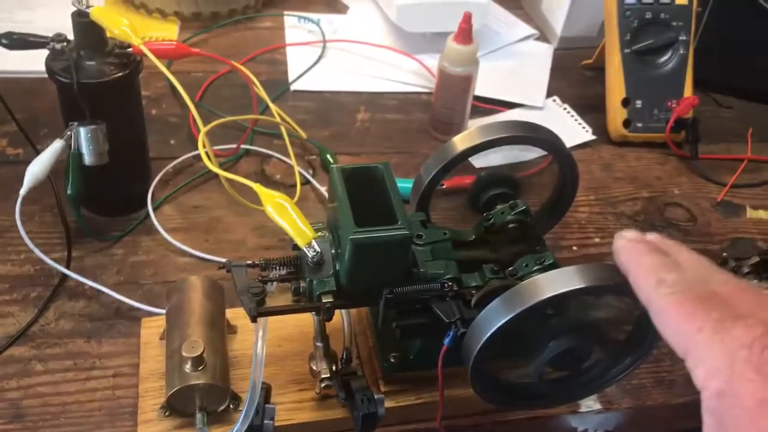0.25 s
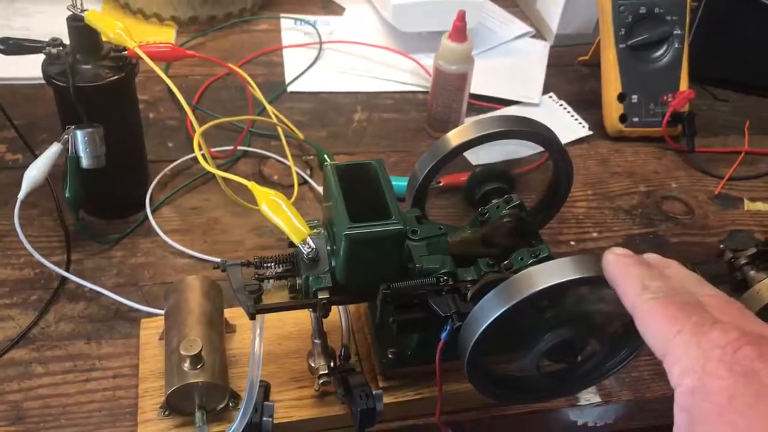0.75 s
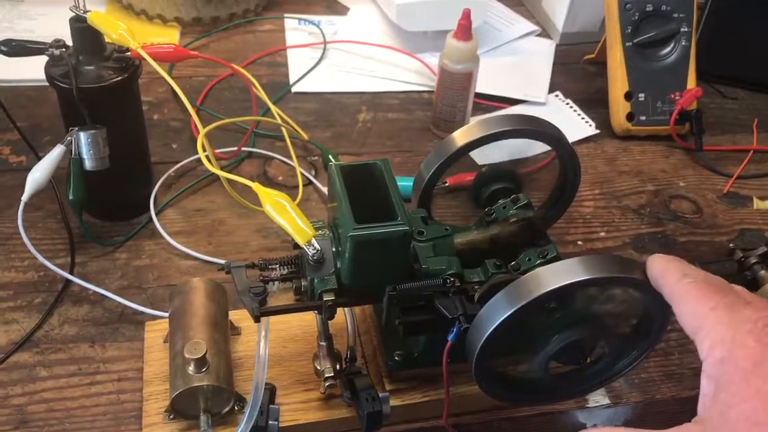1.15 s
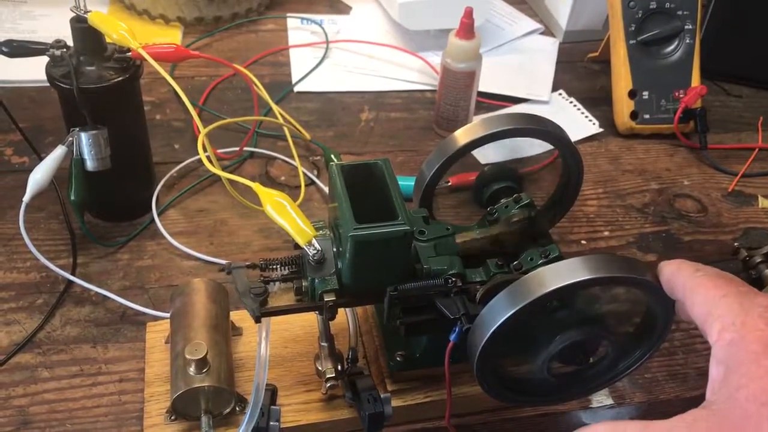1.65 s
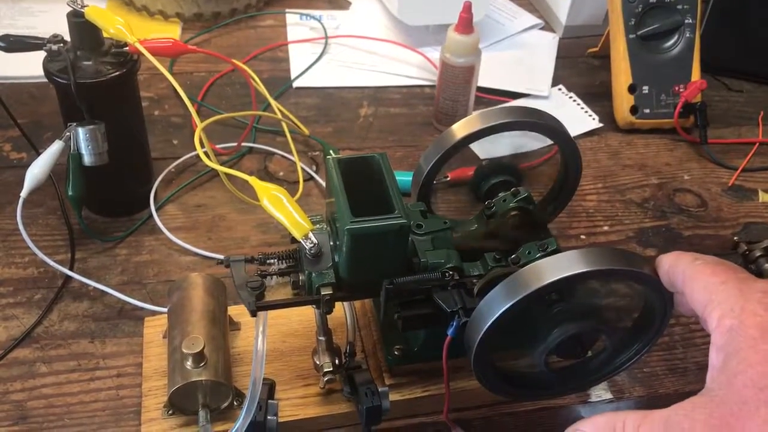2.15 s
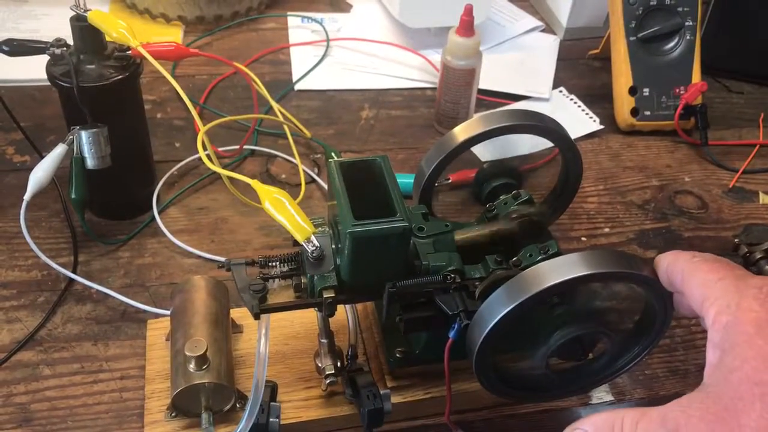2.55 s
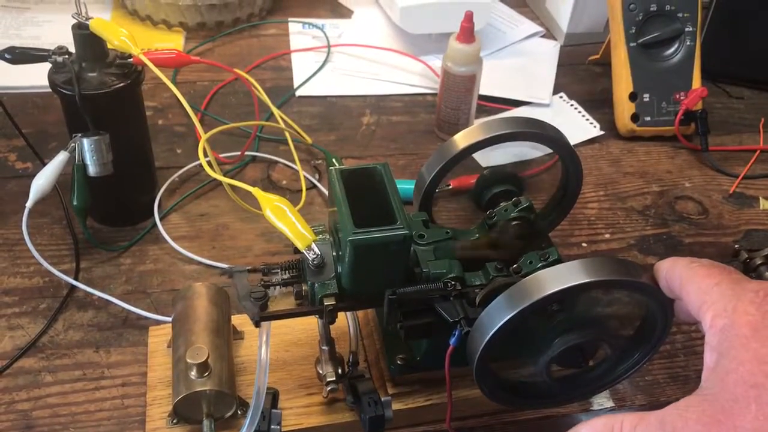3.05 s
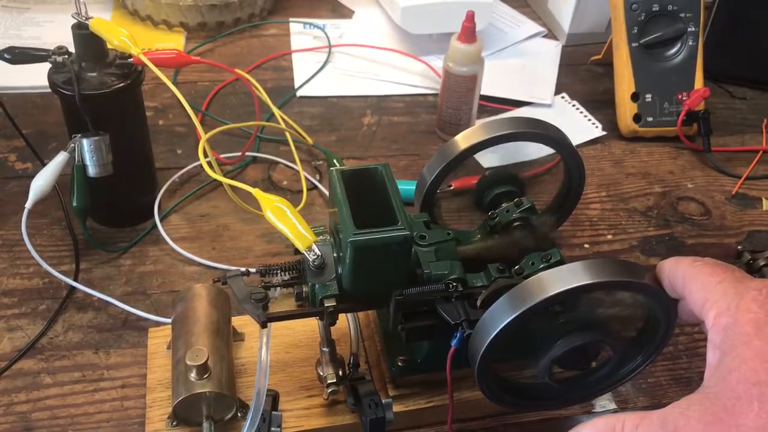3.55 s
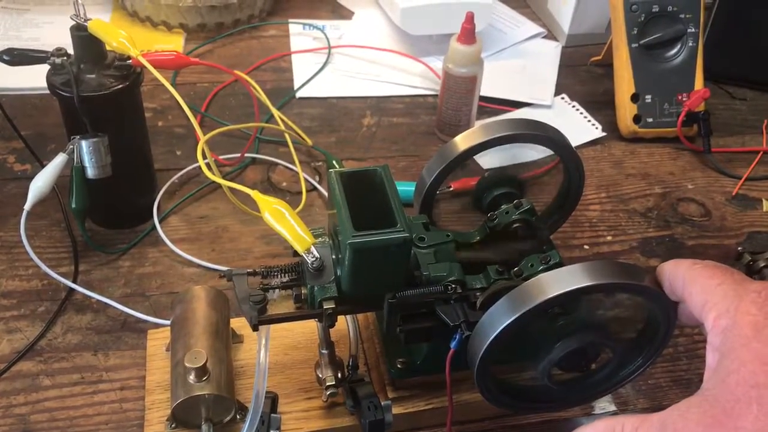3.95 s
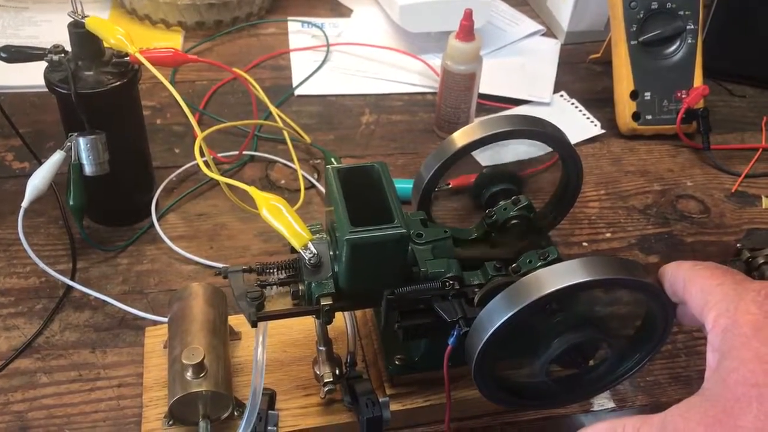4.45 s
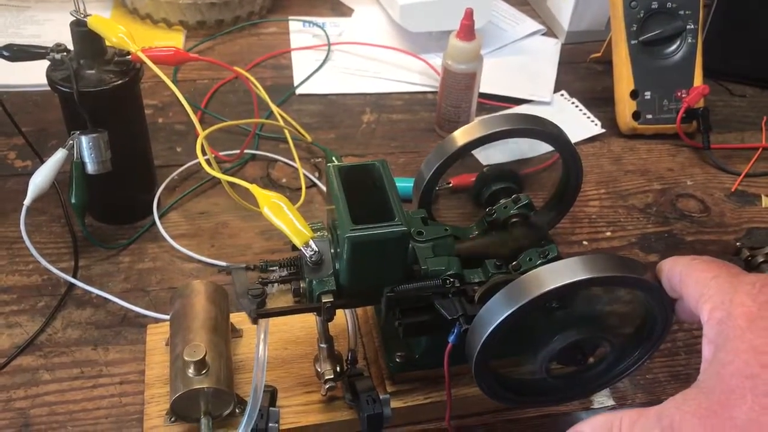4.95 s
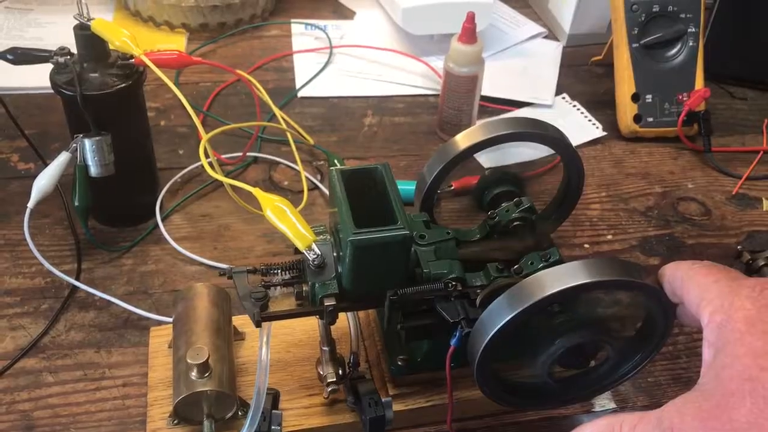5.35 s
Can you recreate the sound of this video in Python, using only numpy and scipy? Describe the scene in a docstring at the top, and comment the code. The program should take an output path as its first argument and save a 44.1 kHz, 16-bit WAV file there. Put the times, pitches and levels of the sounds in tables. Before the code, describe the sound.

Quick iron knocks and ticks come from a miniature gas engine turning at an even speed close to the microphone. Sharp exhaust pops cut through about three times a second in a slightly uneven rhythm, each thumping the wooden bench. Just past halfway it softly misfires once, among stray clacks, and carries on. Soft valve sighs, a thin hiss and a faint hum sit underneath in a small workshop.

```python
"""A model gas engine on a workbench

A small hit-and-miss engine runs close by, at about nine turns a second. It coasts for a few turns,
then fires, mostly on every second or third turn: a sharp exhaust pop and a thump into the wooden bench.
The connecting rod knocks on coasting turns, the piston slaps after each knock or pop, and air sighs
through the open exhaust valve. Once it misfires with a soft thud. The small room has a faint hum."""
import sys
import numpy as np
from scipy import signal
from scipy.io import wavfile
from scipy.ndimage import uniform_filter1d

SR = 44100
rng = np.random.default_rng(int(sys.argv[2]) if len(sys.argv) > 2 else 0)


def master(y):
    """Save y as 16-bit WAV."""
    cut = np.clip(np.atleast_2d(y).T, -1, 1)
    pcm = np.round(cut * 32767)  # scale
    wavfile.write(sys.argv[1], SR, pcm.astype(np.int16))


N = 246947
DEAD_CENTRE = .89  # how far through a turn the piston is deepest in the cylinder


# turns on which the engine fires: (time [s], relative level [dB])
FIRING_TURNS = [(0.7051, -15), (1.2471, -15), (1.5826, -15.5), (1.928, -15), (2.1515, -14), (2.4814, -15),
                (2.815, -15), (3.155, -17), (3.507, -15.5), (3.7355, -16), (4.0677, -15.5), (4.4013, -14),
                (4.7378, -14.5), (5.074, -15), (5.4179, -15.5)]
# tone of the first crack of gas: (frequency [Hz], relative level [dB])
CRACK_TONE = [(100, -40), (500, 3.5), (1000, -9.5), (1600, 0.5), (2200, -3), (3500, 2), (5000, -4),
              (8000, 1), (10200, -5), (11800, 5), (15000, -5)]
# tone of the gush and hiss that follow: (frequency [Hz], relative level [dB])
GUSH_TONE = [(100, -8), (1000, -6), (2200, -12), (3500, -16), (5000, 2.5), (8000, -4), (10200, -5.5),
             (11500, -5), (13000, 0), (15500, -4.5)]
# ringing notes of the thin metal exhaust pipe: (frequency [Hz], relative level [dB], ring time [s])
PIPE_NOTES = [(4680, -1, 0.039), (5985, -6, 0.02), (6900, 6, 0.017), (7600, 7, 0.014), (8830, 28, 0.021),
              (9190, -28, 0.041), (9600, -2, 0.02), (11360, 18, 0.017), (12000, -16, 0.013),
              (12200, -13, .04), (13100, -20, 0.032), (13100, 21, 0.034), (14800, -11, 0.03)]
# the direct sound, then its echoes off the bench and things on it: (delay [s], gain [ratio])
BENCH_ECHOES = [(0, 1), (.0007, .05), (.0019, -.04), (.0031, .2), (.0124, -.06)]

def exhaust_pops(gush_db=-2, hiss_db=-13, pipe_gain=.22):
    """Burnt gas cracks out, gushes and trails off in a hiss. It rings the pipe and echoes off the bench."""
    jet, out = np.zeros(N), np.zeros(N)
    for time, db in FIRING_TURNS:
        crack = normalise(shape_tone(puff(rise_s=.0015, decay_s=.002), CRACK_TONE), size=165)
        gush = normalise(shape_tone(puff(rise_s=.0013, decay_s=.0022), GUSH_TONE), size=180)
        hiss = normalise(shape_tone(puff(rise_s=.0015, decay_s=.008), GUSH_TONE), size=400)
        add(jet, time, gain(db) * crack)
        add(jet, time + .004, gain(db) * (gain(gush_db) * gush + gain(hiss_db) * hiss))
    pipe = ring(PIPE_NOTES, size=3000)
    jet += pipe_gain * signal.fftconvolve(jet, pipe / np.linalg.norm(pipe))[:N]
    for delay, strength in BENCH_ECHOES:
        add(out, delay, strength * jet)
    return out


# low notes of the exhaust port and bench: (frequency [Hz], relative level [dB], ring time [s])
THUMP_NOTES = [(75, -19.5, 0.29), (98.3, -15, 0.17), (120.4, -13, 0.2), (171.3, -11, 0.073),
               (219.6, -1.5, 0.053), (263.8, -13.5, 0.11), (505.6, -3.5, 0.063), (541, -24, 0.12),
               (796, -9.5, 0.13), (921, -8.5, 0.23)]

def bench_thumps(level_db=-24, delay_s=.0031):
    """The push of each firing builds over a millisecond or so and shakes the port and the bench."""
    out = np.zeros(N)
    for time, _ in FIRING_TURNS:
        shake = strike(THUMP_NOTES, spread_db=1.4, size=12000)
        thump = normalise(np.convolve(shake, np.hanning(70)), size=530)  # smoothing softens the start
        add(out, time + delay_s, gain(level_db) * thump)
    return out


# turns on which the engine coasts and the rod knocks: (time [s], relative level [dB])
COASTING_TURNS = [(0.0455, -20.5), (0.1493, -19.5), (0.2556, -20), (0.3647, -21.5), (0.4764, -21),
                  (0.5906, -21), (0.8048, -23), (0.9081, -20), (1.0155, -19.5), (1.13, -22),
                  (1.3527, -21.5), (1.465, -22), (1.69, -26), (1.8057, -21.5), (2.038, -23),
                  (2.2556, -24.5), (2.3662, -21), (2.5869, -22.5), (2.6984, -21.5), (2.9215, -22.5),
                  (3.0358, -23), (3.2647, -23.5), (3.6195, -23), (3.84, -23), (3.9518, -21),
                  (4.1738, -22.5), (4.286, -21.5), (4.5079, -21.5), (4.6202, -21), (4.8438, -22.5),
                  (4.956, -22.5), (5.1816, -22.5), (5.2961, -22), (5.5273, -21.5)]
# hollow notes of the case around the crank: (frequency [Hz], relative level [dB], ring time [s])
CRANKCASE_NOTES = [(1130, -8, .05), (1490, -1, .055), (1630, 0, .04), (1770, -4, .05)]

def rod_knocks(knock_db=-2, hollow_db=-7):
    """On each coasting turn the connecting rod knocks the iron, and the hollow crankcase rings briefly."""
    out = np.zeros(N)
    for time, db in COASTING_TURNS:
        treble_db = rng.normal(5, 1.8)
        knock = iron_hit(treble_db, ring_db=-4, rise_s=.0005, decay_s=.0013, chatter_bass_db=-9)
        crankcase = strike(CRANKCASE_NOTES, spread_db=2.8, size=2500)
        hollow = normalise(np.convolve(crankcase, np.hanning(12)), size=300)
        add(out, time, gain(db + knock_db) * knock)
        add(out, time + .0008, gain(db + hollow_db) * hollow)
    return out


def piston_slaps(level_db=-31, delay_s=.0254):
    """The piston slaps about a quarter of a turn after each knock or firing, never quite the same."""
    out = np.zeros(N)
    for time, _ in list(COASTING_TURNS) + list(FIRING_TURNS):
        slap_time = time + rng.normal(delay_s, .0006)
        slap_db = rng.normal(level_db, 1.5)
        slap = iron_hit(treble_db=2, ring_db=-2, rise_s=.0026, decay_s=.0021, chatter_bass_db=.5)
        add(out, slap_time, gain(slap_db) * slap)
    return out


# stray clacks, ticks and one faint slap: (time [s], level [dB], treble boost [dB], chatter decay [s])
STRAY_HITS = [(3.305, -29, 8, 0.00057), (3.3092, -16, 8.5, 0.0023), (3.381, -40, 26, .0008),
              (3.412, -38, 5, 0.0024), (5.564, -28, 33, 0.00088), (5.5659, -19, 5.5, 0.0034)]

def stray_hits():
    """Stray metal clacks and ticks, and one faint piston slap after the misfire, barely ring the iron."""
    out = np.zeros(N)
    for time, db, treble_db, decay_s in STRAY_HITS:
        hit = iron_hit(treble_db, ring_db=-14, rise_s=.0004, decay_s=decay_s, chatter_bass_db=-8)
        add(out, time, gain(db) * hit)
    return out


# ringing notes of the iron frame and flywheels: (frequency [Hz], relative level [dB], ring time [s])
IRON_NOTES = [(721, -7.9, 0.09), (953, -9.4, 0.09), (1093, -9.8, 0.09), (1163, -7.5, 0.09),
              (1459, 0.0, 0.09), (1518, -3.5, 0.09), (1680, -3.3, 0.09), (1750, -2.9, 0.09),
              (2417, -9.9, 0.06), (2611, -10.2, 0.06), (2767, -11.5, 0.06), (3451, -10.1, 0.06),
              (3758, -6.5, 0.05), (3892, -8.5, 0.05), (4005, -9, 0.05), (4156, -8.8, 0.06),
              (5033, -13.3, 0.06), (5233, -11.3, 0.06), (5518, -12.3, 0.06), (6336, -13.4, 0.06),
              (6417, -14.3, 0.06), (7461, -16.6, 0.06), (8398, -15.6, 0.06), (9324, -13.4, 0.06),
              (11170, -14.7, 0.06), (11375, -14.8, 0.06), (12888, -14.5, 0.06), (13986, -15.1, 0.06)]
# tone of the engine's tick and rattle when hit: (frequency [Hz], relative level [dB])
CLATTER_TONE = [(100, -68), (500, -26), (1000, 3), (1600, -0.5), (2400, 3), (3100, -5), (3800, 6.5),
                (4700, -16), (5600, -9.5), (7800, -18.5), (9400, -11.5), (10400, -18), (11500, -12),
                (15500, -19.5)]

def iron_hit(treble_db, ring_db, rise_s, decay_s, chatter_bass_db, size=3200):
    """A firm push and a chattering contact make the frame tick, rattle its loose parts and ring."""
    ringing = normalise(strike(IRON_NOTES, spread_db=2.8, size=size))
    # the push is the same every time; the chatter is fresh noise
    pulse = signal.unit_impulse(1024, int(rise_s * SR))
    push = shape_tone(pulse, [(2500, -13.5), (6000, -1.5), (12000, -39)])
    contact = normalise(puff(rise_s, decay_s, size=1024)) / np.sqrt(1024)
    chatter = shape_tone(contact, [(1700, chatter_bass_db), (5000, 0)])
    tick = normalise(shape_tone(signal.unit_impulse(size), CLATTER_TONE))
    rattle = normalise(shape_tone(puff(rise_s=.0026, decay_s=.006, size=size), CLATTER_TONE))
    frame = tick + gain(-3) * rattle + gain(ring_db) * ringing
    hit = signal.fftconvolve(push + chatter, frame)
    return normalise(shape_tone(hit, [(3500, 0), (8000, treble_db)]), size=300)


# when the engine misfires: (time [s], level [dB])
MISFIRES = [(3.382, -36)]
# dull notes of the misfire's thud: (frequency [Hz], relative level [dB], ring time [s])
MISFIRE_NOTES = [(187, 15, 0.03), (295, 15, 0.02), (396, -13, 0.03)]

def misfire_thud():
    """A misfire: one soft, dull thud in place of a firing."""
    out = np.zeros(N)
    for time, db in MISFIRES:
        add(out, time, gain(db) * normalise(ring(MISFIRE_NOTES), size=530))
    return out


# tone of gas squeezing past the piston: (frequency [Hz], relative level [dB])
LEAK_TONE = [(300, -22), (1500, -10), (1900, 8), (2300, -8), (3300, 1), (5000, -12), (10000, -16),
             (11800, -4), (15000, -6)]

def piston_leaks(level_db=-36.5, lead_s=.024):
    """Just before each firing, a little of the squeezed gas chirps past the piston."""
    out = np.zeros(N)
    for time, _ in FIRING_TURNS:
        chirp = normalise(shape_tone(puff(rise_s=.004, decay_s=.008), LEAK_TONE), size=400)
        add(out, time - lead_s, gain(rng.normal(level_db, 1.5)) * chirp)
    return out


# gusts through the valve in each turn: (position [turns], width [turns], level [dB])
VALVE_GUSTS = [(.06, 0.13, -42), (0.311, 0.19, -47), (.83, 0.02, -52.5)]

def valve_sighs(turn, middle_hz=1098, swing_octaves=.76, width_hz=120):
    """Air pumped through the valve sounds the cylinder: lower as the piston draws out, higher going in."""
    pitch_hz = middle_hz * 2 ** (swing_octaves * np.cos(2 * np.pi * (turn - DEAD_CENTRE)))
    note = np.exp(2j * np.pi * np.cumsum(pitch_hz) / SR)
    # smoothed noise turns the pure note into a breathy one
    noise = rng.standard_normal(N) + 1j * rng.standard_normal(N)
    smoothing = np.exp(-np.pi * width_hz / SR)
    flutter = signal.lfilter([1], [1, -2 * smoothing, smoothing ** 2], noise)
    gusts = sum(swell(turn, *gust) for gust in VALVE_GUSTS)
    return gusts * normalise((flutter * note).real)


# tone of the sliding parts: (frequency [Hz], relative level [dB])
RUB_TONE = [(100, 2), (400, -2.5), (900, 3), (1250, 2), (1600, 0.5), (2800, -3.5), (3900, 0), (5000, -6.5),
            (8000, -12.5), (10400, -19), (12000, -7), (15500, -12.5)]
# scrapes of the valve gear in each turn: (position [turns], width [turns], relative level [dB])
VALVE_SCRAPES = [(0.318, 0.09, -38), (.63, 0.018, -48)]

def rubbing(turn, rest_db=-52.5, moving_db=-49.5, ring_db=-7):
    """Piston and gears rub, louder as the piston speeds up. They scrape twice a turn and ring the iron."""
    grit = rng.standard_normal(N) * gain(4 * rng.standard_normal(N))
    ringing = normalise(signal.fftconvolve(grit, ring(IRON_NOTES))[:N])
    rub = normalise(shape_tone(grit, RUB_TONE)) + gain(ring_db) * ringing
    piston_speed = np.sin(2 * np.pi * (turn - DEAD_CENTRE))
    scrapes = sum(swell(turn, *scrape) for scrape in VALVE_SCRAPES)
    loudness = gain(rest_db) + gain(moving_db) * piston_speed ** 2 + scrapes
    return rub * loudness * waver(spread_db=2)


# tone of the thin, high hiss: (frequency [Hz], relative level [dB])
HISS_TONE = [(3000, -40), (10400, -16), (11500, 0), (12800, 0), (14000, -5), (15500, -8)]

def high_hiss(turn, settled_db=-60, start_boost_db=13, settle_s=1.25, swing_db=3):
    """A fine hiss starts louder and then settles. It wavers and swells twice a turn."""
    boost_db = start_boost_db * np.exp(-(np.arange(N) / SR / settle_s) ** 2)
    swell_db = swing_db * np.cos(4 * np.pi * (turn - .23))
    loudness = gain(settled_db + boost_db + swell_db) * waver(spread_db=4)
    return loudness * normalise(shape_tone(rng.standard_normal(N), HISS_TONE))


# how long the room rings: (frequency [Hz], time to fade by 60 dB [s])
ROOM_FADE = [(100, 0.29), (800, 0.23), (4000, 0.13), (15000, 0.18)]

def room_echo(sound, first_echo_s=.007, size=20000):
    """Sound bounces around the small workshop, and the low notes linger longest."""
    echoes = rng.standard_normal(size) * (rng.random(size) < .1)
    echoes *= np.arange(size) > first_echo_s * SR
    hz, t, bands = signal.stft(echoes, SR, nperseg=256)
    fade = gain(-60 * t / look_up(ROOM_FADE, hz)[:, None])
    tail = signal.istft(bands * fade, SR, nperseg=256)[1]
    return signal.fftconvolve(sound, tail / np.linalg.norm(tail))[:N]


# notes of the workshop's hum: (frequency [Hz], relative level [dB])
HUM_NOTES = [(80.7, -60), (166.9, -63.5), (247.6, -60.5), (328.4, -77), (565.2, -61.5)]
# tone of the still air: (frequency [Hz], relative level [dB])
AIR_TONE = [(20, -7), (70, 12), (130, 5), (350, -9), (800, -15), (2000, -11), (6000, -2), (16000, -2)]

def workshop_background(air_db=-51, hum_db=-1):
    """The soft noise of still workshop air, with a faint steady hum."""
    t = np.arange(N) / SR
    hum = sum(gain(db) * np.sqrt(2) * np.sin(2 * np.pi * (hz * t + rng.random())) for hz, db in HUM_NOTES)
    air = normalise(shape_tone(rng.standard_normal(N), AIR_TONE, size=8192))
    return gain(air_db) * air + gain(hum_db) * hum


def turn_position():
    """How far the engine is through its turn, from 0 to 1. Each knock, firing or misfire starts a turn."""
    starts = np.sort([time for time, _ in [*COASTING_TURNS, *FIRING_TURNS, *MISFIRES]])
    starts = np.r_[2 * starts[0] - starts[1], starts, 2 * starts[-1] - starts[-2]]  # extend both ends
    return np.interp(np.arange(N) / SR, starts, np.arange(len(starts))) % 1


def swell(turn, centre, width, db):
    """A smooth rise and fall in loudness, once in every turn."""
    distance = (turn - centre + .5) % 1 - .5
    return gain(db) * np.exp(-(distance / width) ** 2)


def waver(spread_db, size=700):
    """A loudness that wanders by chance over a few hundredths of a second."""
    drift = uniform_filter1d(uniform_filter1d(rng.standard_normal(N), size), size)
    return gain(spread_db * normalise(drift))


def puff(rise_s, decay_s, size=4096):
    """A puff of noise that swells, then dies away."""
    t = np.arange(size) / SR
    loudness = np.minimum(t / rise_s, 1) * np.exp(-np.maximum(t - rise_s, 0) / decay_s)
    return loudness * rng.standard_normal(size)


def ring(notes, size=12000):
    """A struck object sounds all its notes at once. Each fades by 60 dB over its ring time."""
    t = np.arange(size) / SR
    return sum(gain(db - 60 * t / ring_s) * np.cos(2 * np.pi * hz * t) for hz, db, ring_s in notes)


def strike(notes, spread_db, size):
    """The ring of one blow: each note comes out a little louder or softer by chance."""
    return ring([(hz, rng.normal(db, spread_db), ring_s) for hz, db, ring_s in notes], size)


def shape_tone(sound, tone, size=2048):
    """Filters a sound to a tone table. The filter never rings ahead of a hit, so hits stay sharp."""
    log_gain = np.log(gain(look_up(tone, abs(np.fft.fftfreq(size, 1 / SR)))))
    response = np.exp(np.conj(signal.hilbert(log_gain)))
    taps = np.fft.ifft(response).real[:size // 2]
    return signal.fftconvolve(sound, taps)[:len(sound)]


def look_up(table, hz):
    """Reads between the rows of a frequency table, with octaves evenly spaced."""
    row_hz, values = np.transpose(table)
    return np.interp(np.log(hz + 1), np.log(row_hz + 1), values)


def gain(db):
    """Turns decibels into a number to multiply by."""
    return 10 ** (np.asarray(db) / 20)


def normalise(sound, size=None):
    """Scales a sound so its first `size` samples (all by default) have an average strength (rms) of 1."""
    return sound / np.sqrt(np.mean(sound[:size] ** 2) + 1e-20)


def add(mix, time, sound):
    """Adds a sound to the mix at a time in seconds."""
    part = mix[max(round(time * SR), 0):][:len(sound)]
    part += sound[:len(part)]


def scene(engine_echo_db=-11, thump_echo_db=-15):
    """The engine and its thumps, their echo in the room, and the background, in one channel."""
    turn = turn_position()
    thumps = bench_thumps()
    engine = rod_knocks() + piston_slaps() + stray_hits() + misfire_thud()
    engine += exhaust_pops() + piston_leaks()
    engine += valve_sighs(turn) + rubbing(turn) + high_hiss(turn)
    echo = room_echo(gain(engine_echo_db) * engine + gain(thump_echo_db) * thumps)
    return (engine + thumps + echo + workshop_background())[None]


def record(dry, low_cut_hz=55, high_cut_hz=15950):
    """Trims away the deepest bass and the very highest treble."""
    bass_cut = signal.butter(3, low_cut_hz, "high", fs=SR, output="sos")
    treble_cut = signal.firwin(255, high_cut_hz, window=("kaiser", 9), fs=SR)
    return signal.oaconvolve(signal.sosfilt(bass_cut, dry), treble_cut[None], "same")


dry = scene()
out = record(dry)
master(out)
```